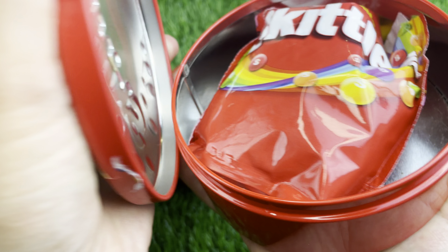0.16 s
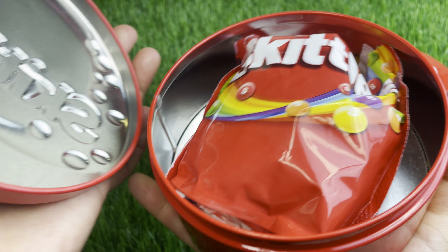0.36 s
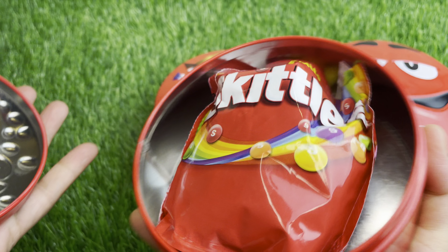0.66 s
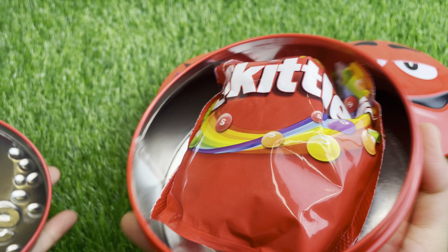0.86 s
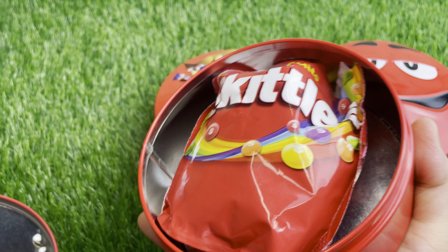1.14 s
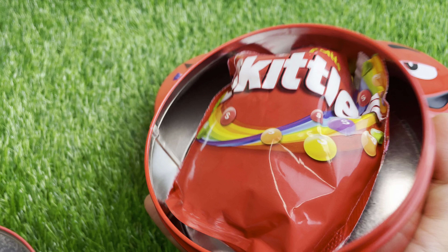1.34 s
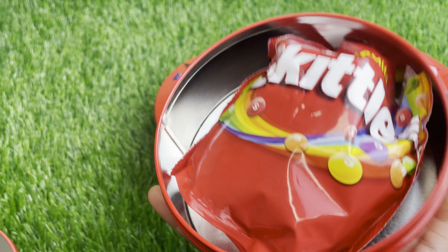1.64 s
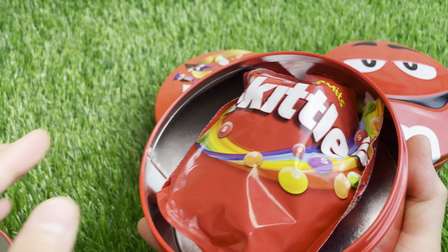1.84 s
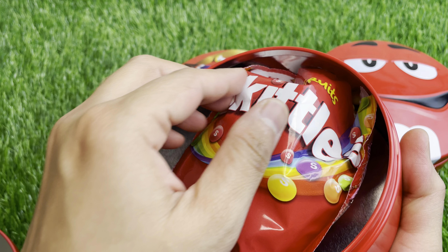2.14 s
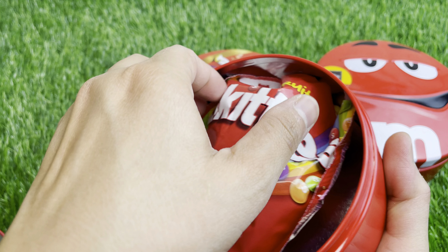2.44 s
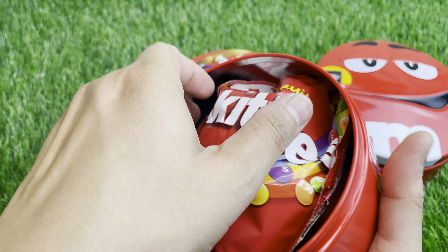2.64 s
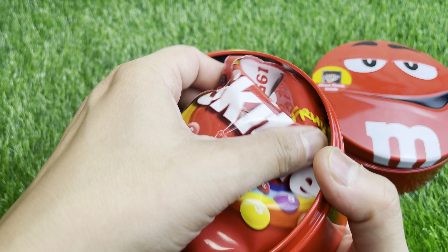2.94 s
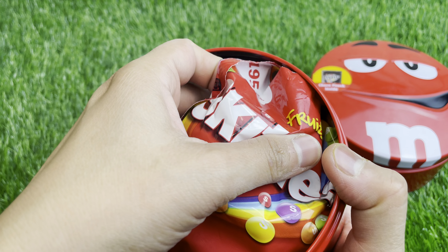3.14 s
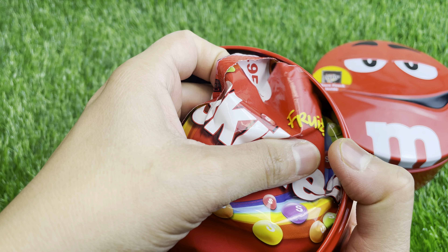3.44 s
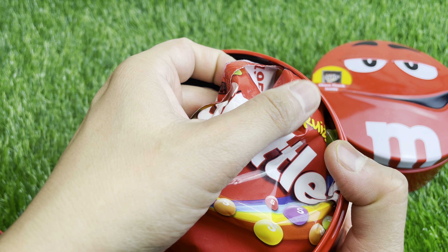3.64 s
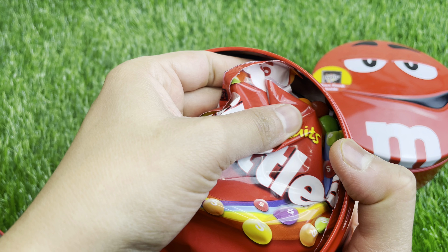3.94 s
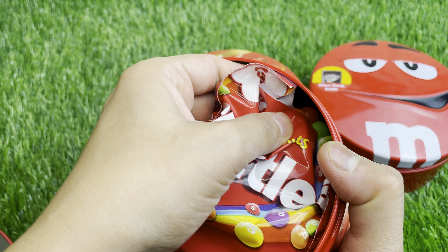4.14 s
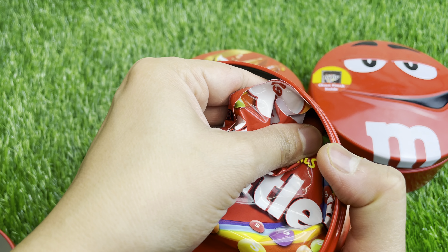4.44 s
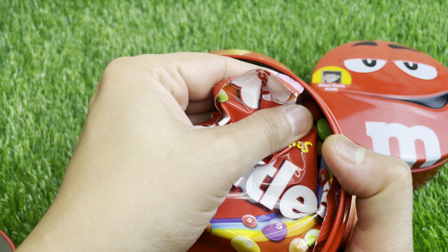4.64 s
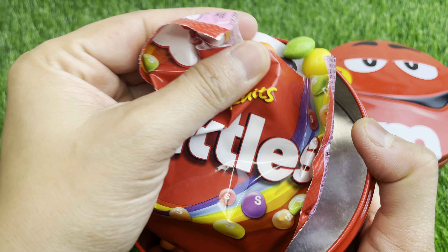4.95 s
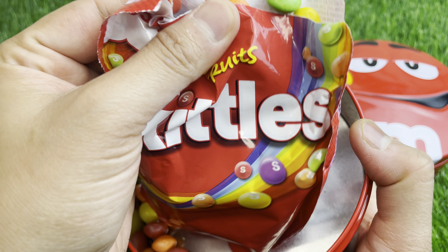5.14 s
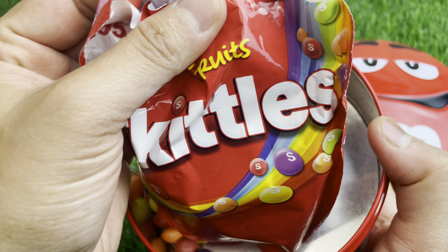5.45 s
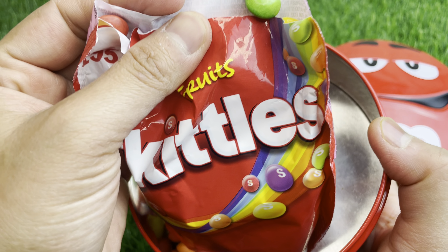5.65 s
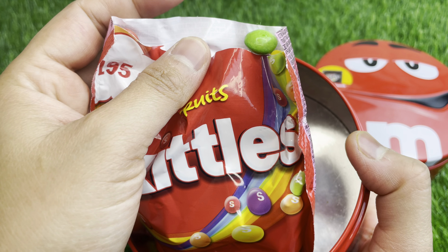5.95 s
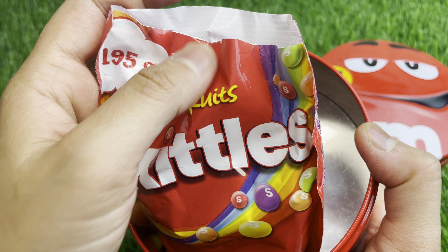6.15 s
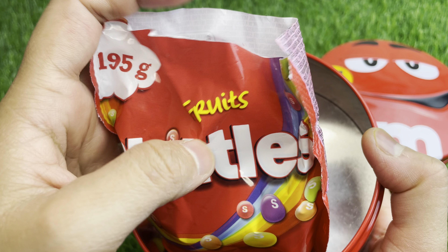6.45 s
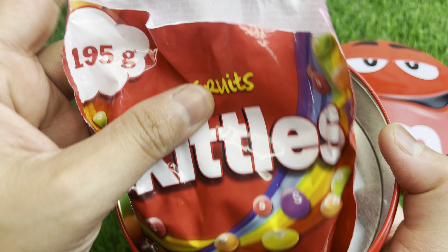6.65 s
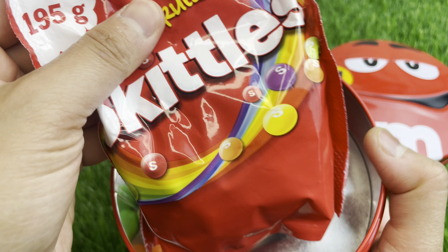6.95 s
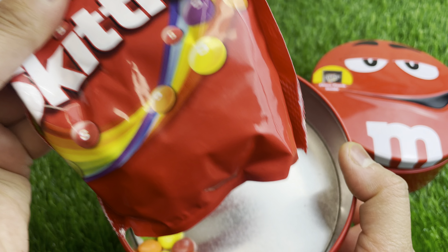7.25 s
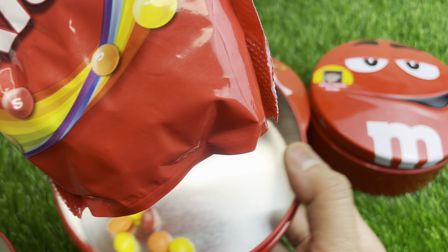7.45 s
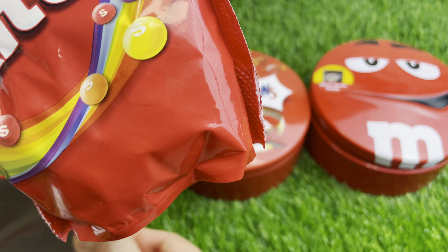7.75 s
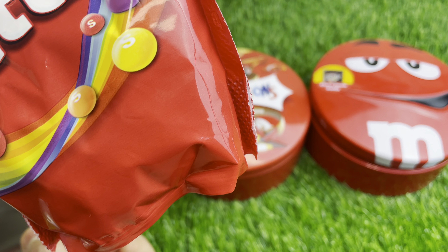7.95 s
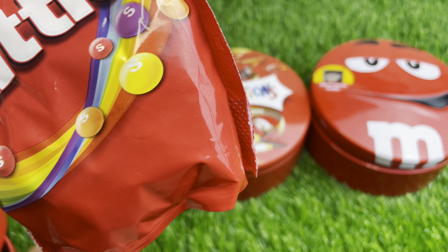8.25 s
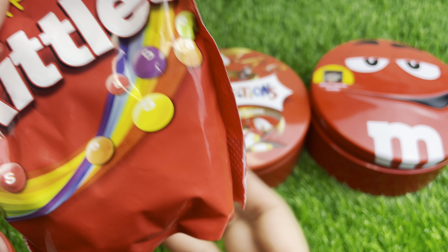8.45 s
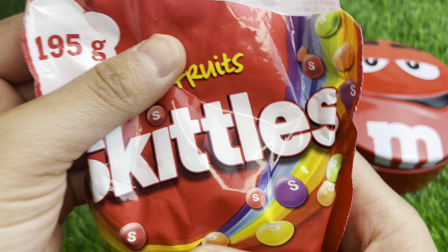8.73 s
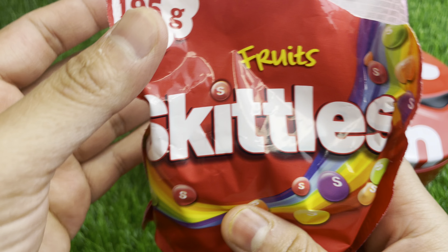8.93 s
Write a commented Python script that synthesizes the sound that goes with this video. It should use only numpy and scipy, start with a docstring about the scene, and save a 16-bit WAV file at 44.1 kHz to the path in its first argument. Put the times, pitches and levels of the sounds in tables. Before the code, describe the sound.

Very close in a small quiet room, a bag of hard sweets slides and slumps in a metal tin with soft grainy rushes. A few hollow finger taps follow, then dense crisp plastic crackling and snapping. Later, loose sweets patter and roll on the tin base, ringing briefly, over low hand rumble and faint steady hiss.

```python
"""A round tin holding a plastic bag of hard sweets is tilted: the sweets slide and slump against the film.
Then fingers pinch the bag out: the film crackles and snaps, and the air in the hollow tin hums with it.
Later, loose sweets drop and roll, ringing the tin's base while their sugar shells click.
Film is shaped noise with sudden kicks; the base is a set of resonances; bumped walls are fading tones.
Close stereo microphone ports hear it all in a small quiet room, over hand rumble and a steady hiss."""
import sys
import numpy as np
from scipy import signal
from scipy.fft import rfft, irfft, next_fast_len
from scipy.io import wavfile
from scipy.ndimage import uniform_filter1d

SR = 44100
rng = np.random.default_rng(int(sys.argv[2]) if len(sys.argv) > 2 else 0)


def bounce(signal):
    """Save signal as a 16-bit WAV file at the path given by the first command-line argument."""
    frames = np.transpose(np.atleast_2d(signal))
    limited = np.clip(frames, -1, 1)
    pcm = np.round(limited * 32767).astype(np.int16)
    wavfile.write(sys.argv[1], SR, pcm)


N = 400869  # samples, about 9 seconds

# hands rumbling through the grip: [t/s, relative level/dB]
GRIP = [(0.0, -62), (.99, -50.5), (1.16, -66), (1.72, -48), (2.0, -82), (2.53, -58.5), (4.48, -69),
        (5.49, -54.5), (6.08, -69), (6.25, -43), (6.45, -67.5), (6.6, -40.5), (6.84, -67), (8.63, -70),
        (8.81, -50), (9.09, -50.5)]
# colour of the grip rumble: [f/Hz, relative level/dB]
RUMBLE_COLOUR = [(30, -32), (60, -1.5), (100, -4.5), (200, -3), (400, -5.5), (700, -38.5)]
# colour of the room and microphone floor: [f/Hz, relative level/dB]
HISS_COLOUR = [(25, -12.5), (57, 5), (100, -14), (900, -11), (2000, -12), (8000, -38), (12500, -24),
               (14000, -28), (16000, -79)]
# how fast the room falls silent: [f/Hz, time to fall 60 dB/s]
ROOM_FALL = [(200, .1), (2000, .045), (12000, .025)]
# room compared with the direct sound: [f/Hz, level/dB]
ROOM_LEVEL = [(200, -6.5), (1500, -1), (5000, 2), (12000, -7.5)]
# phase by which the left port leads the right: [f/Hz, lead/rad]
LEFT_LEAD = [(0, 0), (600, .9), (1460, 2.4), (3000, 3), (4800, 7.6), (6700, 11.9), (7600, 9.7), (9100, 9.3),
             (11000, 6.9), (16500, 6.1)]
# left port compared with the right: [f/Hz, level/dB]
LEFT_LEVEL = [(60, -3.5), (600, 9), (1500, 8.5), (5000, 7.5), (12000, -0.5)]

# ways the tin base rings: [f/Hz, relative level/dB, time to fall 60 dB/s]
BASE_MODES = [(345, -14, .06), (860, -4, .035), (1378, 5, .07), (1540, 4, .06), (1880, -1, .05),
              (2180, 3, .08), (2480, 1, .08), (2760, 1, .07), (2875, 3, .06), (2995, 1, .05),
              (3150, 2, .08), (3560, -5, .05), (3910, -5, .05)]
# loose sweets landing: [t/s, relative level/dB, clatter's time to fall 60 dB/s, favoured f/Hz]
LANDINGS = [(4.331, -11.5, 0.12, 2760), (5.215, -24.5, 0.3, 2840), (6.717, -16, 0.1, 2520),
            (6.748, -14, 0.08, 2590), (6.914, -17, 0.15, 2800), (7.481, -7, 0.08, 1860),
            (7.536, -22, 0.08, 3010), (7.555, -14.5, 0.11, 2950), (7.7314, -9, 0.069, 3020),
            (7.8411, -11.5, 0.16, 2940), (7.893, -9.5, 0.08, 2870), (7.9164, -11.5, 0.088, 2860),
            (7.951, 3, 0.099, 1420), (7.9717, -1, 0.19, 2710), (8.0149, -1, 0.15, 2250),
            (8.041, -8, 0.45, 3300), (8.1643, -7, 0.46, 2310), (8.2237, 0, 0.32, 1300),
            (8.268, -11, 0.099, 1390), (8.452, -11.5, 0.18, 2830), (8.521, -17, 0.13, 2820),
            (8.5455, -17.5, 0.27, 3010), (8.692, -18, 0.28, 2800)]
# loose sweets rolling round the base: [t/s, relative level/dB, favoured f/Hz]
ROLLING = [(6.6, -87, 2700), (6.7, -38, 2770), (6.85, -48.5, 2830), (7.25, -37, 2880), (7.34, -77, 2800),
           (7.41, -27.5, 1850), (7.47, -24, 1870), (7.5, -24.5, 3260), (7.63, -45, 2970), (7.82, -32, 2880),
           (7.93, -35.5, 2860), (8.12, -28.5, 2580), (8.3, -34.5, 1370), (8.42, -29.5, 1530),
           (8.58, -43.5, 1560), (8.7, -76, 1520)]
# colour of the clicking sugar shells: [f/Hz, relative level/dB]
SHELL_COLOUR = [(500, -30.5), (1200, 0), (3300, -3), (5700, -11), (7600, -15), (12700, -8.5), (16000, -41)]
# fingertips bumping and flexing the tin wall: [t/s, level/dB, f/Hz, cycles to fall 60 dB]
WALL_BUMPS = [(2.198, -19.5, 1000, 21), (2.196, -12, 1980, 7.7), (2.361, -14.5, 1240, 11.4),
              (2.457, -17.5, 1120, 11), (3.084, -20, 322, 11), (5.241, -25, 378, 9.3),
              (5.93, -27.5, 363, 17), (6.596, -29, 402, 42), (8.22, -29, 354, 51), (8.864, -18.5, 366, 6.7)]

# sweets sliding in the bag: [t/s, film level/dB]
SLIDING = [(0, -52), (.16, -78), (.22, -44.5), (.68, -34), (.9, -32.5), (1.08, -40), (1.22, -58.5),
           (1.46, -39.5), (1.75, -37.5), (1.94, -53.5), (2.1, -116)]
# fingers working the bag: [t/s, film level/dB]
KNEADING = [(2.13, -59), (2.3, -61), (2.68, -42), (3.44, -36), (3.88, -35.5), (4.18, -40), (4.43, -63.5),
            (4.93, -41), (5.26, -61.5), (5.36, -64.5), (5.48, -38), (5.68, -54.5), (6.2, -54.5),
            (6.42, -52), (6.66, -36.5), (6.97, -53), (7.12, -44), (7.32, -51), (7.5, -43), (8.1, -42.5),
            (8.66, -53), (8.82, -44), (9.09, -45)]
# heaps of sweets slumping against the film: [t/s, relative level/dB]
SLUMP_TIMES = [(0.1825, -30.5), (0.324, -33), (0.451, -24.5), (0.514, -24.5), (0.582, -19), (0.596, -23.5),
               (0.655, -20), (0.699, -20), (0.75, -26.5), (0.79, -27), (0.852, -22.5), (0.876, -21.5),
               (0.922, -28), (0.974, -29), (1.0074, -20), (1.2386, -28.5), (1.328, -28.5), (1.48, -24),
               (1.5306, -15.5), (1.6706, -22.5), (1.71, -18), (1.738, -18)]
# balance of a slump: [hollow level/dB, film level/dB, sizzle level/dB]
SLUMP_BALANCE = [-3, 1, 1]
# creases snapping, and the broadband crack of some taps and landing sweets:
# [t/s, relative level/dB, hollow compared with film/dB, flutter scale/s]
CRACKS = [(1.574, -9.5, -13, 0.014), (1.586, -12.5, -6, 0.023), (1.886, -33, 0, 0.04),
          (2.198, -31.5, -22, 0.015), (2.466, -18, -16, 0.056), (2.5, -25, -5, 0.015),
          (2.596, -26.5, -4.5, 0.11), (2.6287, -15, -7, 0.025), (2.6788, -9.5, -13.5, 0.027),
          (2.713, -29, -4, 0.017), (2.8752, -12.5, -15, 0.014), (2.9362, -11.5, -12.5, 0.042),
          (3.0434, -18, -1, 0.016), (3.125, -17, -8.5, 0.051), (3.162, -12, -34, 0.02),
          (3.209, -11, -10, 0.03), (3.214, -22, 5.5, 0.02), (3.255, -12.5, -2.5, 0.049),
          (3.2984, -21, -3, 0.042), (3.3119, -6, -42, 0.038), (3.3385, -14.5, -2.5, 0.019),
          (3.379, -14, -5, 0.055), (3.4035, -10, -10, 0.04), (3.42, -17.5, -17, 0.11),
          (3.446, -16.5, -6, 0.086), (3.5078, -21.5, -28, 0.1), (3.554, -20, -24, 0.04),
          (3.598, -25, -6, 0.15), (3.6658, -34.5, -8, 0.3), (3.7405, -15, -9, 0.034),
          (3.7535, -26, -3.5, 0.14), (3.7905, -17.5, -17, 0.03), (3.804, -18.5, 4, 0.02),
          (3.902, -16, -6.5, 0.059), (3.9232, -17.5, -11, 0.057), (3.9537, -16, -7.5, 0.074),
          (4.003, -24.5, -32, 0.14), (4.039, -17, -31, 0.082), (4.067, -18, -25, 0.04),
          (4.0976, -22, -32, 0.072), (4.3272, -27.5, -13.5, 0.16), (4.393, -24, -18, 0.1),
          (4.479, -27.5, -9, 0.02), (4.613, -22.5, -5.5, 0.058), (4.673, -39.5, -0.5, 0.22),
          (4.77, -29.5, -0.5, 0.19), (4.793, -25.5, -29, 0.16), (4.8381, -8.5, 2.5, 0.041),
          (4.9474, -45.5, 11, 0.17), (5.025, -16.5, 2, 0.062), (5.045, -15, -4, 0.07),
          (5.1078, -29.5, 2, 0.026), (5.2105, -25, -11.5, 0.11), (5.2441, -20, -4, 0.013),
          (5.4022, -35.5, -10, 0.14), (5.529, -14.5, -16, 0.013), (5.596, -26, -16, 0.065),
          (5.734, -34.5, -16, 0.039), (5.771, -38.5, 5, 0.044), (5.831, -44.5, 16.5, 0.029),
          (5.9267, -30, -0.5, 0.068), (5.981, -20.5, -30, 0.018), (5.99, -34.5, -22, 0.14),
          (6.012, -29.5, -6, 0.026), (6.061, -27, -13, 0.033), (6.077, -23, -11, 0.014),
          (6.223, -40.5, 7.5, 0.07), (6.249, -36.5, 2.5, 0.071), (6.2643, -34.5, -8, 0.13),
          (6.3118, -24, -11, 0.019), (6.35, -22, -18, 0.0097), (6.4877, -22.5, -13, 0.04),
          (6.552, -44, 9, 0.17), (6.578, -24.5, 0, 0.062), (6.6023, -9, -6, 0.06),
          (6.652, -25.5, 1.5, 0.012), (6.6633, -14, -16, 0.02), (6.671, -16, -10, 0.023),
          (6.799, -37, 9, 0.023), (6.892, -15, -17, 0.034), (6.996, -16, -46, 0.01),
          (7.184, -28, -16.5, 0.16), (7.238, -19, -15, 0.027), (7.536, -19, -14.5, 0.1),
          (7.664, -21.5, -7, 0.062), (7.7333, -23.5, -38, 0.072), (7.9494, -19, -21, 0.033),
          (8.019, -29, -12, 0.21), (8.227, -36, -2, 0.18), (8.523, -38, -41, 0.33),
          (8.7467, -14, -13, 0.014), (8.773, -35, 7, 0.015), (8.81, -16.5, -9, 0.017),
          (8.867, -13.5, -14, 0.011), (8.9576, -25, -4.5, 0.024)]
# treble of the cracks compared with the film: [t/s, level/dB]
CRACK_TREBLE = [(2.2, -3.5), (2.5, 0), (5.3, -1), (5.55, 1.5), (6.5, 7.5), (6.6, -0.5), (8.6, -3),
                (8.75, -1.5)]
# colour of the air in the tin: [f/Hz, relative level/dB]
HOLLOW_COLOUR = [(120, -38.5), (330, -4.5), (600, -4), (860, 5.5), (1100, 4), (1500, -8), (2500, -52.5)]
# colour of the film: [f/Hz, relative level/dB]
FILM_COLOUR = [(700, -22), (1400, -0.5), (1900, 0.5), (2800, 0), (4400, -5), (5600, -5.5), (6800, -4),
               (7500, -7.5), (9000, -3), (12000, -51.5)]
# colour of the film's top end: [f/Hz, relative level/dB]
SIZZLE_COLOUR = [(7000, -78), (9300, 1.5), (10500, -0.5), (12700, 5), (14000, -2.5), (15600, -14.5),
                 (16500, -63)]

TOP_HZ = 16700  # nothing is kept above this
BODY_HZ, BODY_DB = 1000, -4.5  # below this the whole tin answers a rolling sweet, wherever it touches
SHELL_ROLL_DB, SHELL_LAND_DB = -13, -22  # shell clicks compared with rolling and landing
FIRM_DB = -40  # film level at which the next two offsets hold
HOLLOW_DB, HOLLOW_GROWS = -2, 0.7  # the tin's air compared with the film; it swells less
SIZZLE_DB, SIZZLE_GROWS = -2.5, 1.1  # the top end compared with the film; firmer handling is brighter
LIFT_S, CLEAR_S, LIFT_LOSS_DB = 5.6, 7.9, 6  # the tin moves away from the bag, which stirs its air less
FLIP_DB, FLUTTER_DB = [13.5, 9, 9], [-3, -5.5, -5]  # kick and settling of a crack: (hollow, film, sizzle)
BUILD_S = 0.0018  # the flutter starts this long before the kick: a crease creaks before it flips
BURST = SR // 4  # samples in one short event


def amp(db):
    """Turn decibels into a gain."""
    return 10 ** (np.asarray(db) / 20)


def unit(x):
    """Scale to an average (rms) strength of 1."""
    return x / np.sqrt(np.mean(x ** 2) + 1e-20)


def along(points, hz):
    """Read a curve of (Hz, value) points on a logarithmic pitch axis."""
    f, v = np.transpose(points)
    return np.interp(np.log(hz + 1), np.log(f + 1), v)


def curves(rows):
    """Give one value per sample for each column after the time."""
    s, *cols = np.transpose(rows)
    return [np.interp(np.arange(N) / SR, s, c) for c in cols]


def filtered(x, response):
    """Multiply the spectrum of x by a response that depends on frequency."""
    m = next_fast_len(N + SR // 2)
    spectrum = rfft(x, m) * response(np.fft.rfftfreq(m, 1 / SR))
    return irfft(spectrum, m)[..., :N]


def coloured(x, spectrum):
    """Colour a sound without smearing it backwards in time; white noise keeps its power."""
    size = 2 ** 12
    gain = unit(amp(along(spectrum, np.fft.rfftfreq(size, 1 / SR))))
    # folding the cepstrum forwards puts the filter's energy as early as possible
    cepstrum = irfft(np.log(gain), size)
    cepstrum[1:size // 2] *= 2
    cepstrum[size // 2 + 1:] = 0
    kernel = irfft(np.exp(rfft(cepstrum)), size)
    if x.ndim > 1:
        kernel = kernel[None]
    return signal.fftconvolve(x, kernel, axes=-1)[..., :N]


def fade(t60, rise):
    """A quick rise and an exponential fall of 60 dB in t60 seconds (at least 3 ms)."""
    t = np.arange(BURST) / SR
    return amp(-60 * t / max(t60, .003)) * (1 - np.exp(-t / max(rise, 1e-5)))


def add_burst(power, s, burst):
    """Add the power of a short event starting at s seconds, as unrelated noises add."""
    power[..., round(s * SR):][..., :BURST] += burst ** 2


def grains(per_s, spread_db, t60, bed_db=-30):
    """Envelope of rms 1 from random tiny contacts of scattered size, over a bed too dense to tell apart."""
    happens = rng.random(N) < per_s / SR
    sizes = happens * amp(spread_db * np.clip(rng.standard_normal(N), -2, 1.5))
    power = signal.fftconvolve(sizes ** 2, fade(t60, 0.00086) ** 2)[:N]
    return unit(unit(np.sqrt(np.abs(power))) + amp(bed_db))


def patchy(depth_db):
    """White noise whose colour changes from moment to moment, as each crease has its own pitch."""
    z = signal.stft(rng.standard_normal(N), nperseg=256)[2]
    field = uniform_filter1d(rng.standard_normal(z.shape), size=4, axis=0)  # smooth over pitch
    field = uniform_filter1d(field, size=6, axis=1)  # smooth over time
    return unit(signal.istft(z * amp(depth_db * unit(field)), nperseg=256)[1][:N])


def background():
    """Low, bumpy hand rumble through the grip, partly shared by the two ports, and a steady hiss."""
    shared = rng.standard_normal(N)
    own = rng.standard_normal((2, N))
    rumble = amp(curves(GRIP)[0]) * grains(170, 6.3, 0.055) * (shared + 0.58 * own)
    rumble = coloured(rumble, RUMBLE_COLOUR) * amp([[1.6], [-1.6]])  # left louder
    hiss = amp(-65.0) * coloured(rng.standard_normal((2, N)), HISS_COLOUR)
    return rumble + hiss


def room(x, count=5):
    """Noise tails in which each pitch dies at its own speed; the tail in use changes every 50 ms."""
    hz, t, z = signal.stft(rng.standard_normal((count, 2, SR // 5)), SR, nperseg=256)
    z = z * amp(-60 * t / np.maximum(along(ROOM_FALL, hz), .01)[:, None])
    energy = np.mean(np.sum(np.abs(z) ** 2, axis=3), axis=(0, 1))
    z = z / np.sqrt(energy)[:, None]  # equal energy at every pitch
    tails = signal.istft(z, SR, nperseg=256)[1]
    tails = tails / np.linalg.norm(tails) * np.sqrt(2 * count)
    turn = np.arange(N) // (SR // 20) % count
    wet = sum(signal.oaconvolve(x[None] * (turn == k), tail, axes=1)[:, :N] for k, tail in enumerate(tails))
    return filtered(wet, lambda hz: amp(along(ROOM_LEVEL, hz)))


def ports(x):
    """The near source leads in phase at the left port and is louder there over most pitches."""
    side = np.array([[1], [-1]]) / 2  # half the difference to each port

    def response(hz):
        """Level and phase at each port."""
        lead = np.interp(hz, *np.transpose(LEFT_LEAD))
        return amp(side * along(LEFT_LEVEL, hz)) * np.exp(1j * side * lead)

    return filtered(x, response)


def favour(hz, centre_hz, narrow_db, least_db):
    """Gain of a mode, falling as its pitch moves away from the one favoured by the touching place."""
    return amp(np.maximum(-narrow_db * np.log2(hz / centre_hz) ** 2, least_db))


def base_ring():
    """Landing and rolling sweets push noise into the base's resonances; the touching place picks modes."""
    roll_db, roll_hz = curves(ROLLING)
    bumps = grains(200, 6, .025, bed_db=-6)
    out = np.zeros(N)
    for hz, level, life in BASE_MODES:
        touched = amp(BODY_DB) if hz < BODY_HZ else favour(hz, roll_hz, 400, -22)
        push = np.pad((amp(roll_db) * touched * bumps) ** 2, (0, SR))
        for s, db, t60, centre_hz in LANDINGS:
            clatter = fade(t60, 0.00031) + 0.86 * fade(0.0026, .0001)  # bounces, plus first contact
            size = amp(db - 12.5 + rng.normal(0, 2))  # each landing rings each mode differently
            add_burst(push, s, size * favour(hz, centre_hz, 230, -14) * clatter)
        mode = signal.iirpeak(hz, hz * max(life, .01) * np.pi / np.log(1000), SR)
        drive = np.sqrt(push[:N]) * rng.standard_normal(N)
        evened = np.sqrt(SR * life / np.log(1000) / 2)  # makes up for the narrowness of the mode
        out += amp(level - 10.0) * evened * signal.lfilter(*mode, drive)
    return out


def shell_clicks():
    """Sugar shells click drily against each other: fine grains of noise during rolling and landing."""
    power = np.pad(amp(curves(ROLLING)[0] + SHELL_ROLL_DB) ** 2, (0, SR))
    for s, db, t60, _ in LANDINGS:
        add_burst(power, s, amp(db + SHELL_LAND_DB) * fade(1.02 * t60, 0.00021))
    clicks = grains(890, 3.0, 0.0042, bed_db=-1) * rng.standard_normal(N)
    return coloured(np.sqrt(power[:N]) * clicks, SHELL_COLOUR)


def wall_bumps():
    """Fingertips bump and flex the tin wall, which answers with single fading tones."""
    out = np.zeros(N + SR)
    t = np.arange(BURST) / SR
    for s, db, hz, cycles in WALL_BUMPS:
        tone = fade(cycles / hz, 0.6 / hz) * np.sin(2 * np.pi * hz * t)
        out[round(s * SR):][:BURST] += amp(db) * tone
    return out[:N]


def tin():
    """The struck tin: its ringing base, the shells clicking on it and its bumped wall."""
    return base_ring() + shell_clicks() + wall_bumps()


def add_handling(push):
    """Many tiny contacts crackle the film while sweets slide, then while fingers work the bag."""
    t = np.arange(N) / SR
    late = t > KNEADING[0][0]
    lifted_db = LIFT_LOSS_DB * np.interp(t, [LIFT_S, CLEAR_S], [0, 1])
    slide_grain = grains(650, 10.2, 0.011)
    knead_grain = grains(260, 9.7, 0.015, bed_db=-7.0)
    for rows, active, grain in ((SLIDING, ~late, slide_grain), (KNEADING, late, knead_grain)):
        film_db, = curves(rows)
        hollow_db = FIRM_DB + HOLLOW_DB + HOLLOW_GROWS * (film_db - FIRM_DB) - lifted_db
        sizzle_db = FIRM_DB + SIZZLE_DB + SIZZLE_GROWS * (film_db - FIRM_DB)
        push[:, :N] += (active * grain * amp([hollow_db, film_db, sizzle_db])) ** 2


def add_slumps(push):
    """Heaps of sweets fall against the film: many contacts together make a soft rise."""
    shape = np.array([fade(0.17, 0.014), fade(0.16, 0.012), fade(0.13, 0.011)])
    slump = amp(SLUMP_BALANCE)[:, None] * shape
    for s, db in SLUMP_TIMES:
        add_burst(push, s, amp(db) * slump)


def cracks():
    """Snapping creases, and some taps and landings, give a sharp kick and a short noisy flutter."""
    settle, kicks = np.zeros((2, 3, N + SR))
    chances = rng.random((len(CRACKS), 2))
    for (s, db, hollow_db, t60), (gap, share) in zip(CRACKS, chances):
        treble_db = np.interp(s, *np.transpose(CRACK_TREBLE))
        bands_db = db + np.array([hollow_db, 0, treble_db])
        size = amp(bands_db + FLIP_DB)
        kick_s = s + BUILD_S
        kicks[:, round(kick_s * SR)] += size
        # a second kick of random size and delay varies each click's colour
        kicks[:, round((kick_s + .0002 + .001 * gap) * SR)] += (1.79 * share - .4) * size
        flutter = np.array([fade(1.16 * t60, 0.0025), fade(t60, 0.0016), fade(t60, 0.00063)])
        flutter *= t60 / 0.074  # short ones stay dry
        add_burst(settle, s, amp(bands_db + FLUTTER_DB)[:, None] * flutter)
    return settle, kicks


def bag():
    """Slides, crackle and cracks shake the film; each also sets the air in the tin humming."""
    push = np.zeros((3, N + SR))  # power of (hollow, film, sizzle)
    add_handling(push)
    add_slumps(push)
    settle, kicks = cracks()
    ticks = grains(450, 7.4, 0.0093, bed_db=-6.5)  # settling comes in small ticks
    push[:, :N] += settle[:, :N] * ticks ** 2
    noise = np.array([patchy(3.2), patchy(0.91), patchy(5.1)])
    shake = np.sqrt(push[:, :N]) * noise + kicks[:, :N]
    colours = (HOLLOW_COLOUR, FILM_COLOUR, SIZZLE_COLOUR)
    return sum(coloured(x, colour) for x, colour in zip(shake, colours))


def scene():
    """Bag and tin near the microphone ports, with the room and the background behind."""
    near = bag() + tin()
    return ports(near) + room(near) + background()


def record(dry):
    """The loudest peaks are gently rounded to avoid clipping; nothing is kept above the band limit."""
    rounded = dry / (1 + np.abs(dry / .9) ** 4) ** (1 / 4)
    return filtered(rounded, lambda hz: hz < TOP_HZ)


dry = scene()
out = record(dry)
bounce(out)
```